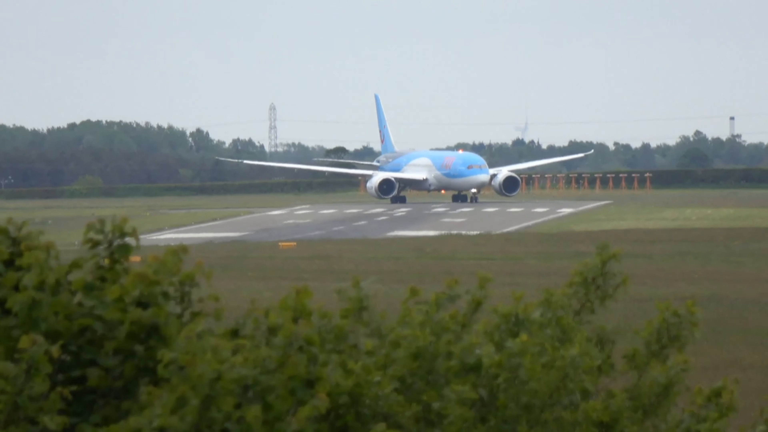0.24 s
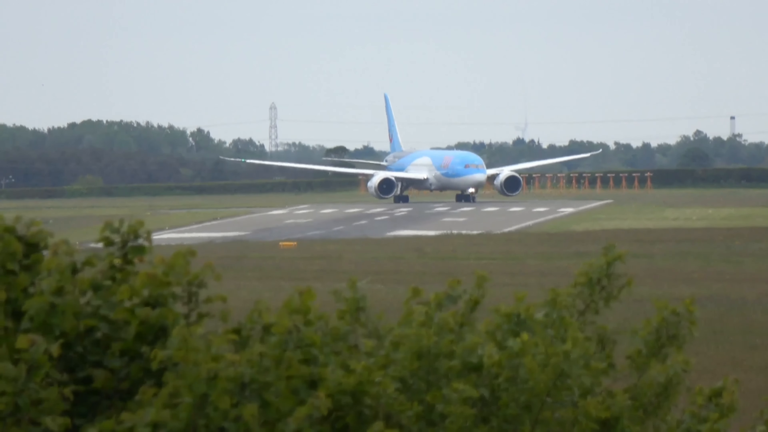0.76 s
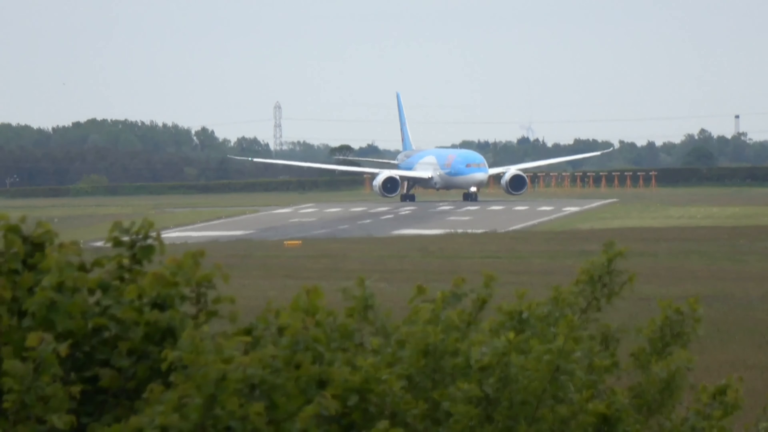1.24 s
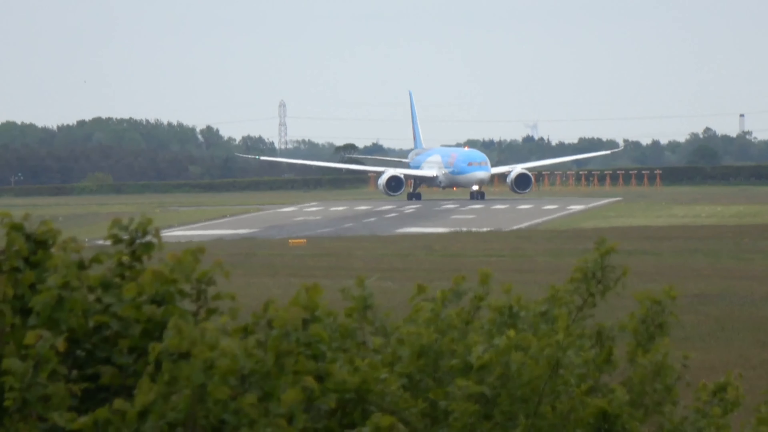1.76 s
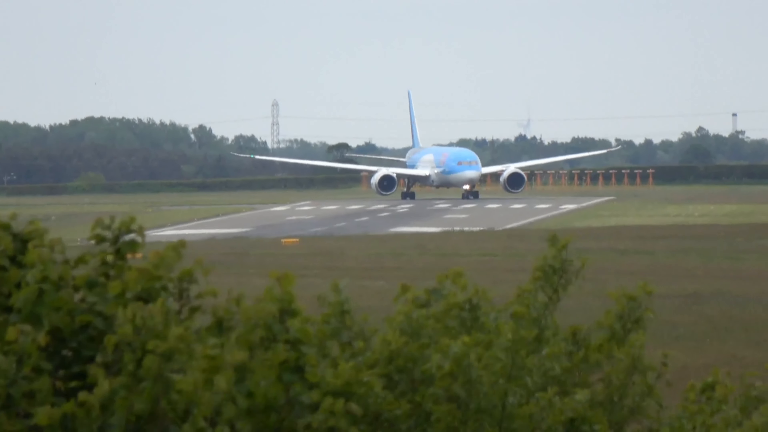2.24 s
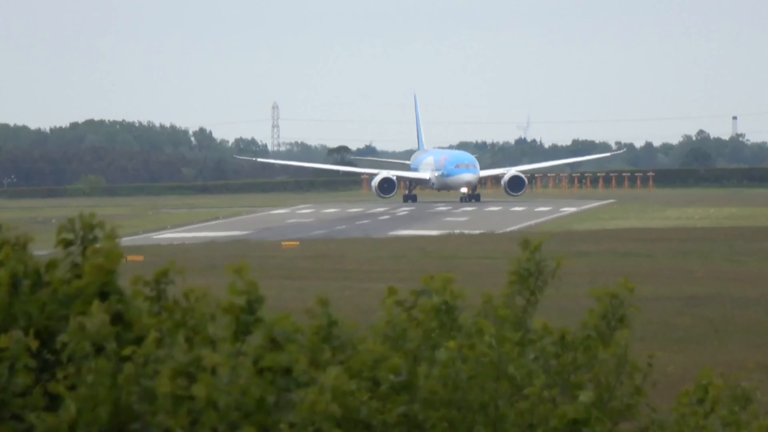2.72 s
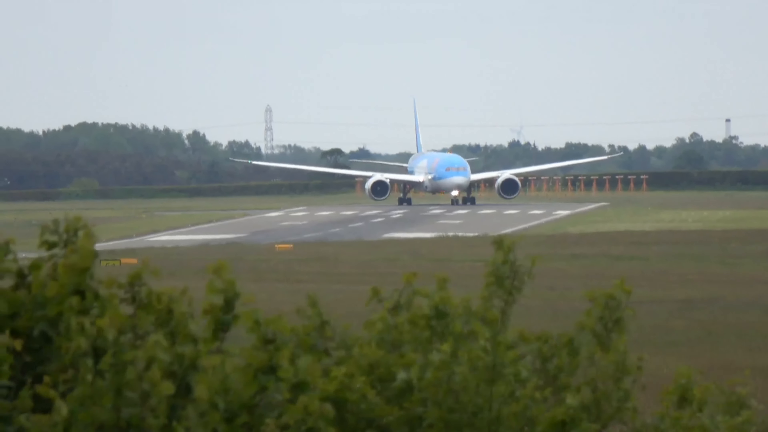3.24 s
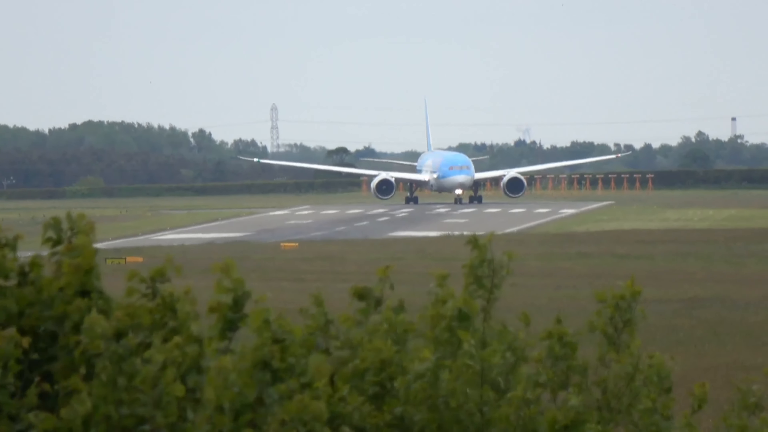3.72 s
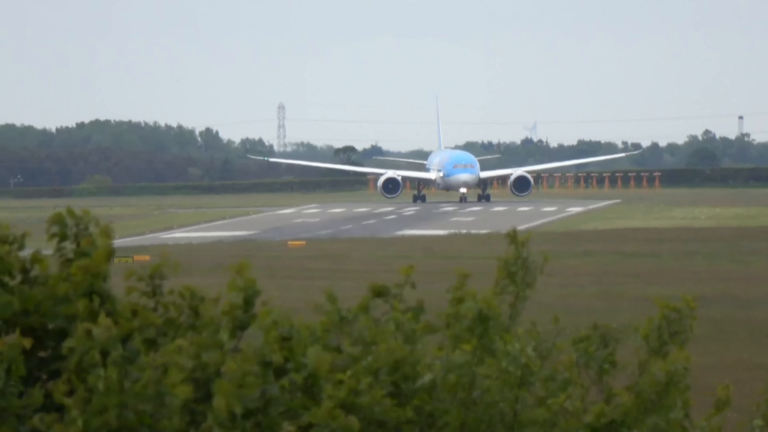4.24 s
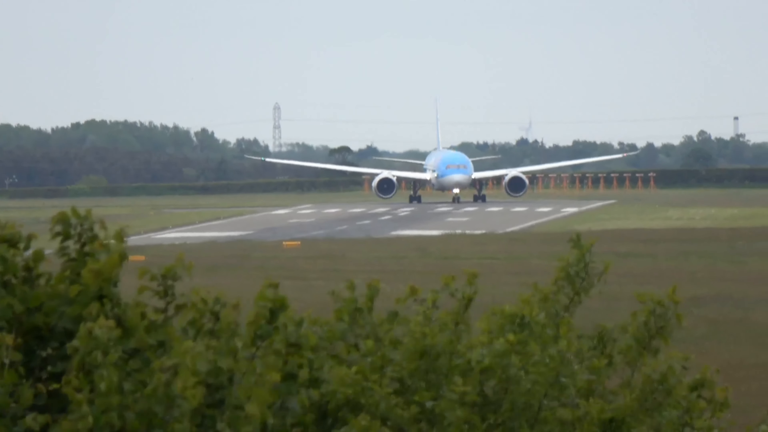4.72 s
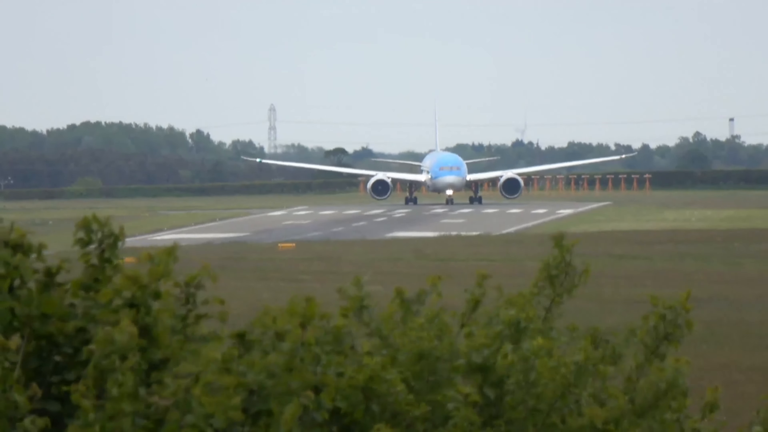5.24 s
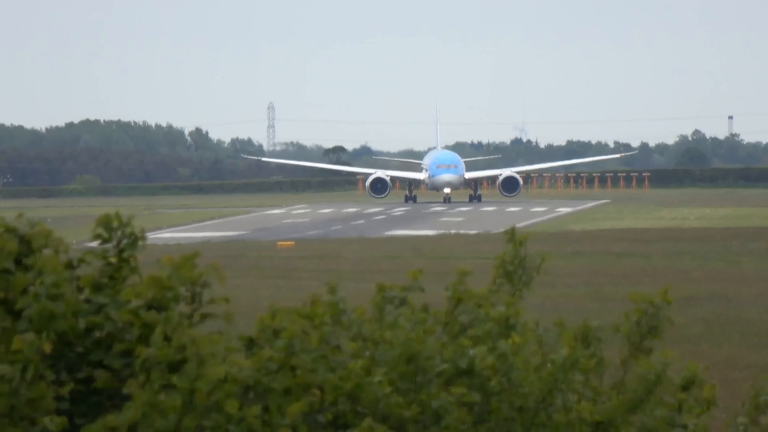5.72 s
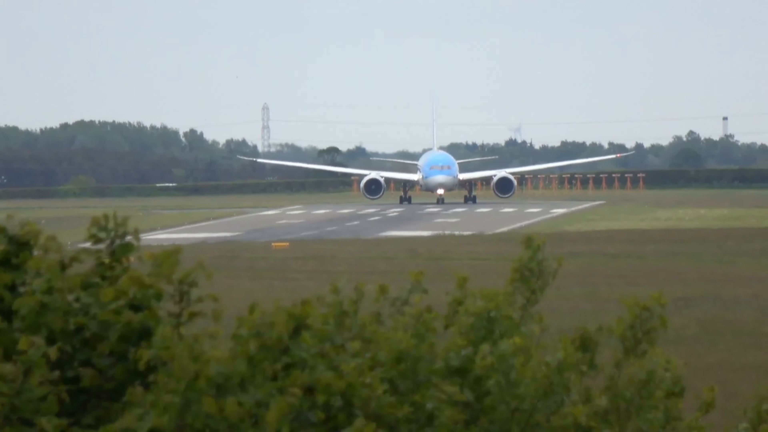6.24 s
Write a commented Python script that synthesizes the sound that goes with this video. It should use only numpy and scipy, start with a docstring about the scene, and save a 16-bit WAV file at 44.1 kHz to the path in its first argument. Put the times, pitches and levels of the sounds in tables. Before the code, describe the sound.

An airliner's jet engines hiss and rumble at low thrust some way off, with wind buffeting the microphone and faint birds.

```python
"""Two jet engines at low thrust are heard across grass as an airliner turns onto a runway some way off.
The intake hiss and exhaust roar are shaped noise; a faint whine and a low hum, which swells late and
then sinks, are sums of wavering sines. Gusts buffet the microphone as low-frequency noise.
One bird whistles close by and another sings among the trees, both as gliding sines; high air hiss
lies behind them."""
import sys
import numpy as np
from scipy import signal
from scipy.fft import rfft, irfft
from scipy.io import wavfile
from scipy.ndimage import uniform_filter1d, map_coordinates

SR = 44100
rng = np.random.default_rng(int(sys.argv[2]) if len(sys.argv) > 2 else 0)


def waveform_to_disk(signal):
    """Save audio, clipped to [-1, 1], as 16-bit WAV at the path in sys.argv[1]."""
    frames = np.transpose(np.atleast_2d(signal))
    scaled = np.clip(frames, -1, 1) * 32767
    samples = np.round(scaled).astype(np.int16)
    wavfile.write(sys.argv[1], SR, samples)


N = 285768
HOP = 256  # samples between noise frames
TIME = np.arange(N) / SR
FRAME_S = np.arange(N // HOP + 3) * HOP / SR
BIN_HZ = np.fft.rfftfreq(8 * HOP, 1 / SR)

# spectral shape of the air and leaf hiss: [f/Hz, relative level per Hz/dB]
AIR_COLOUR = [(1500, -8), (3500, 15.5), (4500, 14), (5500, 10), (6500, 3), (7500, -0.5), (9000, -2),
              (11000, -4)]
# air hiss: [t/s, band level/dB before frame overlap]
AIR_LEVEL = [(0.0, -69), (1.0, -71), (2.5, -72), (3.5, -73), (4.3, -72), (5.0, -69), (6.48, -69)]

# light air between gusts, before its random sway: [t/s, slow push level/dB, quick flutter level/dB]
BREEZE = [(0, -22, -30.5), (1.4, -25, -35), (2.15, -30, -37), (3.55, -23, -32.5), (4.25, -29, -34),
          (5.5, -23, -28.5), (6.48, -21, -30)]
BREEZE_SWAY_DB, BREEZE_SWAY_HZ = 2, 3.9  # rms and rate of the sway
# single gusts: [t/s, hold/s, slow push level/dB, quick flutter level/dB]
GUSTS = [(0.025, 0.037, -9.5, -35), (.1, .09, -8, -15), (0.216, 0.199, -15.5, -23),
         (0.492, 0.075, -12, -16.5), (0.611, 0.202, -15, -25), (0.91, 0.135, -9, -21.5),
         (1.17, 0.036, -9, -25), (1.796, 0.056, -21, -35), (2.27, 0.045, -14, -32), (2.448, .07, -16, -33),
         (2.739, 0.059, -9.5, -29), (2.87, 0.061, -6, -24), (3.1, 0.061, -7.5, -26.5),
         (3.281, 0.089, -7.5, -23.5), (3.963, 0.046, -20.5, -44), (4.659, 0.09, -13, -32),
         (5.222, 0.054, -19.5, -30.5), (5.589, 0.212, -11, -23.5), (5.854, .14, -15.5, -23),
         (6.037, .14, -13, -26), (6.38, .07, -11, -22.5)]
GUST_RISE_S, GUST_FALL_S = 0.02167, 0.03236  # time constants of every gust
# spectral shape of wind pressure on the microphone: [f/Hz, relative level per Hz/dB]
GUST_COLOUR = [(3, -25.5), (10, -3.5), (18, 4.5), (28, -0.5), (40, -7), (65, -15.5), (100, -30),
               (160, -39.5), (400, -69), (1500, -110)]

# near bird: [t/s, length/s, start f/Hz, middle f/Hz, end f/Hz, level/dB at the note's crest]
WHISTLES = [(.028, .052, 3400, 3430, 3640, -42.5), (.07, .022, 3460, 4020, 4720, -46),
            (.088, .052, 4750, 4760, 4700, -55), (.198, .13, 4650, 4180, 3320, -47),
            (.395, .09, 3000, 3720, 3040, -41), (.535, .085, 3100, 3680, 3100, -44),
            (.705, .06, 3350, 3700, 3350, -47.5), (1.04, .075, 3600, 3900, 4430, -52),
            (1.105, .12, 4350, 4560, 3650, -61), (1.37, .049, 3300, 3700, 4000, -54),
            (2.215, .12, 4350, 3760, 3300, -54.5), (2.425, .08, 3350, 3660, 3180, -49.5),
            (2.63, .066, 3900, 3700, 3200, -50), (4.97, .035, 4800, 4850, 4500, -56.5),
            (5, 0.12, 4450, 4360, 4080, -55.5), (5.885, .035, 4900, 4780, 4600, -58),
            (5.995, .04, 5100, 5350, 5400, -55.5), (6.25, .035, 4800, 4900, 4850, -57),
            (6.39, .025, 3470, 3830, 4700, -45), (6.415, .05, 5420, 5340, 5020, -53)]
# far bird: [t/s, length/s, start f/Hz, end f/Hz, crest level/dB before distance loss, trill depth/Hz]
SONG = [(0.223, 0.088, 8600, 8500, -71, 150), (2.44, .12, 4900, 5020, -59.5, 220),
        (2.58, 0.14, 5000, 5030, -59.5, 180), (2.72, .15, 7650, 7700, -69.5, 120),
        (2.75, .17, 7000, 6850, -67, 150), (3.019, .087, 4430, 4230, -52.5, 120),
        (3.184, .1, 6000, 5710, -58, 130), (3.28, 0.069, 5650, 5630, -60, 30),
        (3.315, 0.11, 5230, 5100, -57, 120), (3.44, 0.078, 3900, 3850, -51.5, 30),
        (3.56, .09, 3860, 3820, -52.5, 33), (3.67, .11, 7120, 7240, -62.5, 40),
        (3.897, .11, 5580, 5500, -58.5, 19), (4.636, .045, 7400, 6400, -60, 150),
        (4.731, 0.044, 3860, 4120, -46, 110), (4.834, .04, 3920, 4130, -47.5, 100),
        (4.92, 0.054, 7500, 6350, -62, 120), (4.968, .11, 6130, 5850, -57, 50),
        (5.29, .036, 5400, 7000, -61, 110), (5.66, .084, 6800, 6780, -61, 44),
        (5.8, .041, 5400, 6150, -55, 59), (5.86, 0.1, 6150, 6140, -60.5, 25),
        (6.05, .11, 5960, 6070, -60, 30), (6.177, 0.053, 6080, 5850, -58, 150)]
# the far bird's twitter: a run of quick buzzy notes, each falling through nearly the same range
TWITTER_S, TWITTER_STEP_S, TWITTER_NOTE_S, TWITTER_DB = 5.08, 0.062, 0.047, -55
TWITTER_TOP_HZ, TWITTER_END_HZ, TWITTER_SCATTER_HZ, TWITTER_TRILL_HZ = 5920, 4790, 201, 300

# fundamental of the engine hum, itself not sounded: [t/s, f/Hz, level/dB before each harmonic's offset]
HUM = [(0, 52.3, -56), (3.5, 50.5, -42.5), (4, 50.5, -41), (4.5, 50.3, -40), (4.8, 50.03, -32),
       (5.5, 50, -29.5), (5.9, 49.77, -31), (6.2, 49.3, -33), (6.48, 49.8, -42.5)]
# harmonics that sound: [multiple of the fundamental, level offset/dB]
HUM_HARMONICS = [(2, -3.5), (3, -4), (4, -8.5)]
# faint fan whine: [t/s, f/Hz, level/dB]
WHINE = [(0, 900, -51.5), (.9, 907, -45), (1.6, 919, -38.5), (2.6, 935, -48), (4, 945, -53),
         (6.48, 908, -55)]

# the low roar's changing fullness: [t/s, share of the fuller sound/1, f/Hz of its hollow resonance,
# height of that resonance/dB]
ROAR = [(0, 0.06, 247, 4.5), (.8, 0.57, 258, 7), (1.6, 0, 247, 8.5), (2.4, 0, 223.1, 6.5),
        (3.2, 0.14, 224, 6.5), (4.2, 0.27, 221, 6), (5, 0.73, 226, 1.5), (5.6, 0.92, 214, 0.5),
        (6.48, 0.75, 218, 4.5)]
# engine level, swelling and fading as the breeze carries it: [t/s, level/dB]
CARRY = [(0, 0), (.25, -2), (.8, 1), (1.3, -1.2), (2.1, .3), (2.75, 0.95), (3.3, -1.14), (4.7, 0),
         (5.35, 1), (5.7, 3), (6.05, 0.9), (6.48, 2)]
# spectrum of the thinner roar: [f/Hz, relative level per Hz/dB]
EXHAUST_THIN = [(20, -9), (60, -3.5), (100, -5.5), (135, -3.5), (200, -2), (260, -3.5), (330, -5.5),
                (400, -13), (470, -16.5), (600, -31.5), (1200, -61.5)]
# spectrum of the fuller roar: [f/Hz, relative level per Hz/dB]
EXHAUST_FULL = [(20, -12), (60, -0.5), (125, -3), (200, -2), (250, 1.5), (315, 0.5), (380, -6), (450, -11),
                (520, -27), (650, -22), (1200, -60.5)]
# band level before carry, fullness and frame overlap; share of each swell taken; gain when full
EXHAUST_DB, EXHAUST_SWELL, FULL_GAIN_DB = -25.5, 0.45, 2.4

# intake spectrum, low near the ground-reflection dip: [f/Hz, relative level per Hz/dB]
INTAKE_COLOUR = [(450, -22), (560, -15), (700, -10.5), (800, -6), (890, -1.5), (980, -4), (1150, -7),
                 (1350, -9.5), (1600, -11.5), (2100, -17), (3000, -23.5), (3800, -29), (4300, -40.5),
                 (5500, -57)]
# lobe that sweeps upward as the intakes swing toward the listener: [t/s, centre f/Hz, height/dB]
LOBE = [(0, 950, -0.5), (1, 1000, 1), (2.3, 1300, -0.5), (2.8, 1730, 0), (3.3, 2060, 4), (4, 2100, 2.5),
        (4.7, 2120, 2), (5.3, 2580, 3), (6.48, 2700, 2)]
# bright edge of the hiss, before its weighting over frequency: [t/s, level/dB]
EDGE = [(0, -3), (.65, -1.5), (1.3, -4.5), (2.4, -4), (3.2, -3.5), (3.9, -5.5), (4.4, -4), (5.15, -2.5),
        (6.48, -4)]
# band level before carry and frame overlap; share of each swell that the bright edge resists
INTAKE_DB, EDGE_STEADINESS = -24, .6
SHOULDER_HZ, SHOULDER_DB = 750, 0.7  # when full, the hiss fills out just above the ground dip


def gain_of(db):
    """Logarithmic level law: decibels to amplitude."""
    return 10 ** (np.asarray(db) / 20)


def evened(x):
    """Energy normalisation: scales to an rms of one."""
    return x / np.sqrt(np.mean(x ** 2) + 1e-20)


def read(points, hz):
    """Spectral interpolation: a level at hz, linear in dB over log frequency."""
    f, value = np.transpose(points)
    return np.interp(np.log(hz + 1), np.log(f + 1), value)


def follow(rows, t):
    """Linear interpolation in time: each column of a table at the times t."""
    s, *columns = np.transpose(rows)
    return [np.interp(t, s, c) for c in columns]


def octaves_from(centre_hz):
    """Logarithmic pitch scale: signed distance of every bin from a centre, in octaves."""
    return np.log2((BIN_HZ + 1) / centre_hz)


def add(mix, s, sound):
    """Linear superposition: mixes a sound in at s seconds."""
    part = mix[max(round(s * SR), 0):][:len(sound)]
    part += sound[:len(part)]


def coloured(db):
    """Spectral filtering: steady noise of rms one whose spectrum is the function db(Hz)."""
    white = rfft(rng.standard_normal(N))
    return evened(irfft(white * gain_of(db(np.fft.rfftfreq(N, 1 / SR))), N))


def wander(rate_hz):
    """Low-passed randomness: a drift of rms one, 10 dB down at rate_hz."""
    return coloured(lambda hz: -10 * (hz / rate_hz) ** 2)


def turbulence(colour_db, level_db, band_hz, patchy_db):
    """Random-phase synthesis: noise of a changing colour, patchy in time and frequency as in moving air."""
    real, imaginary, patches = rng.standard_normal((3, len(FRAME_S), len(BIN_HZ)))
    patches = uniform_filter1d(patches, size=20, axis=0)  # smoothed over frames
    patches = evened(uniform_filter1d(patches, size=18, axis=1))  # smoothed over bins
    size = gain_of(colour_db + patchy_db * patches)
    # level_db refers to the energy within the band
    inside = (BIN_HZ > band_hz[0]) & (BIN_HZ < band_hz[1])
    size /= np.sqrt((size[:, inside] ** 2).sum(axis=1, keepdims=True))
    spectra = (real + 1j * imaginary) * size * gain_of(level_db)[:, None]
    # the overlapping frames are independent, so their average lies some 5 dB lower
    return signal.istft(spectra.T, nperseg=2048, noverlap=2048 - HOP)[1][:N]


def air():
    """Broadband turbulence noise: the faint high hiss of moving air and leaves."""
    level_db, = follow(AIR_LEVEL, FRAME_S)
    return turbulence(read(AIR_COLOUR, BIN_HZ), level_db, (8800, 10800), patchy_db=1.7)


def gusts():
    """Addition of powers: each gust rises, holds and dies back into the swaying breeze."""
    breeze_db = np.array(follow(BREEZE, TIME)) + BREEZE_SWAY_DB * wander(BREEZE_SWAY_HZ)
    power = gain_of(breeze_db) ** 2
    for s, hold, push_db, flutter_db in GUSTS:
        before, after = np.maximum(s - TIME, 0), np.maximum(TIME - s - hold, 0)
        shape = np.exp(-before / GUST_RISE_S - after / GUST_FALL_S)
        power = power + (gain_of([[push_db], [flutter_db]]) * shape) ** 2
    return np.sqrt(power)


def without_swells(x):
    """Envelope division: evens out a noise by its Hilbert envelope, averaged over 3000 samples."""
    return x / np.sqrt(uniform_filter1d(abs(signal.hilbert(x)) ** 2, size=3000) / 2)


def wind(split_hz=48, full_gust_db=-9, speed_share=0.19):
    """Eddy pressure on a microphone: big slow eddies push, smaller quick ones flutter."""
    slow, quick = gusts()
    big = coloured(lambda hz: read(GUST_COLOUR, hz) - 10 * np.log10(1 + (hz / split_hz) ** 8))
    small = coloured(lambda hz: read(GUST_COLOUR, hz) - 10 * np.log10(1 + (split_hz / (hz + 1)) ** 8))
    # in a lull the big eddies pass more slowly, so their pitch sinks
    travelled = np.cumsum((slow / gain_of(full_gust_db)) ** speed_share)
    big = map_coordinates(big, [travelled], order=3, mode="mirror")
    # the gust alone sets how strong the eddies are
    push = slow * without_swells(big) + quick * without_swells(small)
    return push / (1 + (push / .85) ** 6) ** (1 / 6)  # the hardest pushes round off


def trees(x, t60):
    """Multiple scattering: sparse random echoes from trunks and leaves, decaying 60 dB in t60 seconds."""
    t = np.arange(SR) / SR
    struck = rng.random(SR) < 2000 / SR  # about 2000 echoes a second
    taps = rng.standard_normal(SR) * struck * gain_of(-60 * t / t60)
    return signal.oaconvolve(x, taps / np.linalg.norm(taps))[:N]


def bird(notes, jitter_hz, pointed=.4, trill_hz=110):
    """Frequency modulation: near sines glide through three pitches, some with a fast trill."""
    out, jitter = np.zeros(N), jitter_hz * wander(140)
    for s, length, start, middle, end, db, *trill in notes:
        t = np.arange(0, length, 1 / SR)
        when, pitches = [0, length / 2, length], [start, middle, end]
        rounded = np.polyval(np.polyfit(when, pitches, 2), t)
        hz = (1 - pointed) * rounded + pointed * np.interp(t, when, pitches)
        hz += sum(trill) * np.sin(2 * np.pi * (trill_hz * t + rng.random()))
        hz += np.roll(jitter, -round(s * SR))[:len(t)]
        swell = np.sqrt(np.abs(np.sin(np.pi * t / length)))
        add(out, s, np.sqrt(2) * gain_of(db) * swell * np.sin(2 * np.pi * np.cumsum(hz) / SR))
    return out


def far_notes(count=10):
    """Linear glides: the far bird's song and twitter, each middle pitch the mean of its ends."""
    twitter = []
    for k, (a, b) in enumerate(TWITTER_SCATTER_HZ * rng.standard_normal((count, 2))):
        twitter.append((TWITTER_S + k * TWITTER_STEP_S, TWITTER_NOTE_S, TWITTER_TOP_HZ + a,
                        TWITTER_END_HZ + b, TWITTER_DB, TWITTER_TRILL_HZ))
    return [(s, length, start, (start + end) / 2, end, db, trill)
            for s, length, start, end, db, trill in SONG + twitter]


def birds(near_echo_db=-14, far_db=-3, far_echo_db=-3.0):
    """Direct-to-scattered ratio: the near bird is almost dry, the far one as strong in echo as direct."""
    near = bird(WHISTLES, jitter_hz=20, pointed=0.51)
    far = bird(far_notes(), jitter_hz=40, trill_hz=85.3)
    echoes = trees(gain_of(near_echo_db) * near + gain_of(far_echo_db) * far, t60=0.42)
    return near + gain_of(far_db) * far + echoes


def tone(rows, multiple=1, waver_hz=1, fading_db=1):
    """Periodic radiation: one line of a spinning rotor, wavering and fading on its way through the air."""
    hz, db = follow(rows, TIME)
    turns = np.cumsum(multiple * hz + waver_hz * wander(4.31)) / SR
    return np.sqrt(2) * gain_of(db + fading_db * wander(5.7)) * np.sin(2 * np.pi * turns)


def rotors():
    """Harmonic series: the engines' low hum, with a single faint whine above it."""
    hum = sum(gain_of(db) * tone(HUM, k, waver_hz=.5, fading_db=1) for k, db in HUM_HARMONICS)
    return hum + tone(WHINE, waver_hz=3.21, fading_db=0.0)


def exhaust(width_hz=22):
    """Jet mixing noise: a low roar whose fullness and hollow resonance change over time."""
    fullness, hollow_hz, hollow_db = (c[:, None] for c in follow(ROAR, FRAME_S))
    fullness = np.clip(fullness, 0, 1)
    colour_db = (1 - fullness) * read(EXHAUST_THIN, BIN_HZ) + fullness * read(EXHAUST_FULL, BIN_HZ)
    colour_db += hollow_db / (1 + ((BIN_HZ - hollow_hz) / width_hz) ** 2)
    colour_db -= 20 * np.log10(1 + (BIN_HZ / 1500) ** 2)
    carry_db, = follow(CARRY, FRAME_S)
    level_db = EXHAUST_DB + EXHAUST_SWELL * carry_db + FULL_GAIN_DB * fullness[:, 0]
    return turbulence(colour_db, level_db, (170, 420), patchy_db=0.73)


def intake(roll_off_db=40, lobe_octaves=0.22, shoulder_octaves=0.13):
    """Interference and absorption: fan hiss, dipped near 500 Hz by the grass reflection, its top lost in air."""
    carry_db, = follow(CARRY, FRAME_S)
    fullness = follow(ROAR, FRAME_S)[0][:, None]
    edge_db = follow(EDGE, FRAME_S)[0] - EDGE_STEADINESS * carry_db
    lobe_hz, lobe_db = (c[:, None] for c in follow(LOBE, FRAME_S))
    edge_weight = read([(1100, 0.0075), (2300, 0.82)], BIN_HZ)
    # roll-off per octave above 5500 Hz and below 450 Hz
    octaves_out = np.maximum(octaves_from(5500), 0) + np.maximum(-octaves_from(450), 0)
    colour_db = read(INTAKE_COLOUR, BIN_HZ) + edge_db[:, None] * edge_weight - roll_off_db * octaves_out
    colour_db += lobe_db * np.exp(-.5 * (octaves_from(lobe_hz) / lobe_octaves) ** 2)
    shoulder = np.exp(-.5 * (octaves_from(SHOULDER_HZ) / shoulder_octaves) ** 2)
    colour_db += fullness * SHOULDER_DB * shoulder
    return turbulence(colour_db, INTAKE_DB + carry_db, (650, 1700), patchy_db=0.83)


def scene():
    """Superposition: air, wind, birds and aircraft at one microphone."""
    return (air() + wind() + birds() + rotors() + exhaust() + intake())[None]


def record(dry, edge_hz=11050):
    """Band limitation: soft ends, then a linear-phase low-pass."""
    eased = dry * signal.windows.tukey(N, .001)
    low_pass = signal.firwin(511, edge_hz, window=("kaiser", 9), fs=SR)
    return signal.oaconvolve(eased, low_pass[None], "same")


dry = scene()
out = record(dry)
waveform_to_disk(out)
```